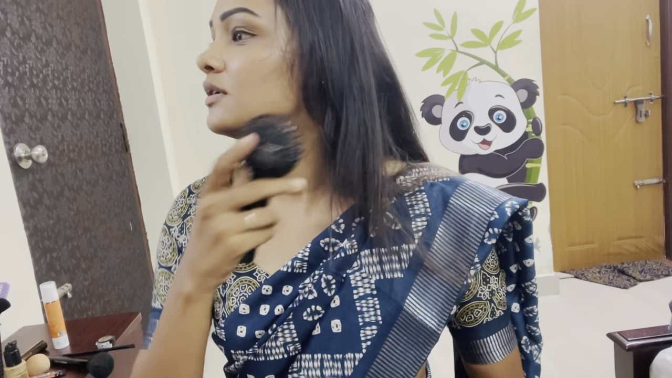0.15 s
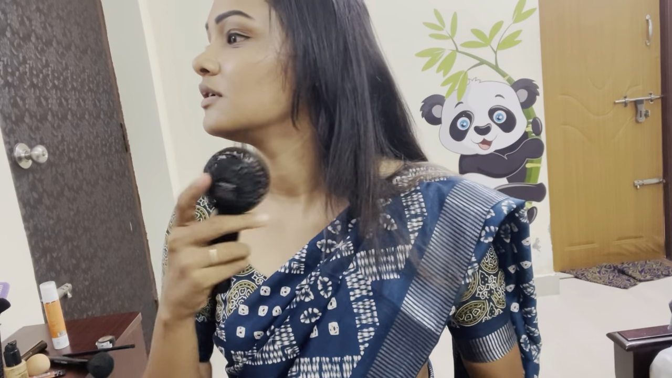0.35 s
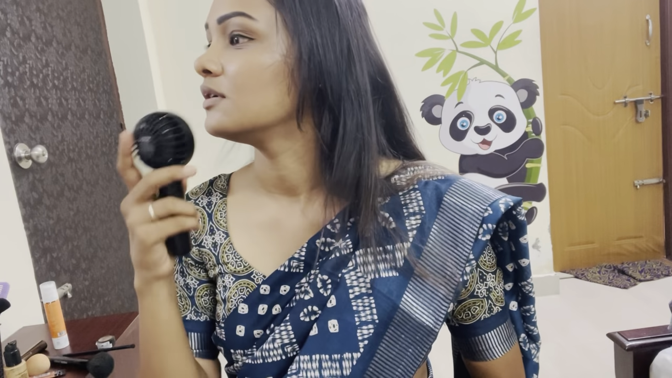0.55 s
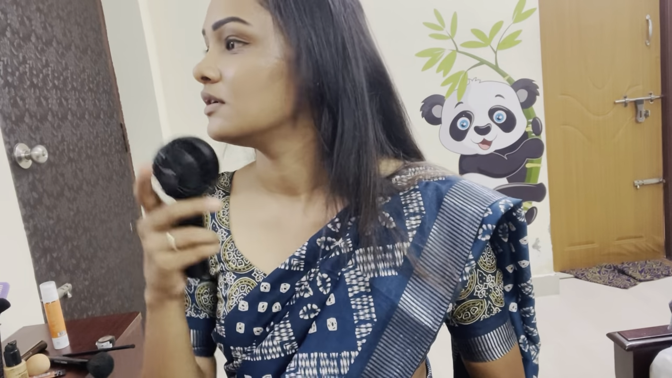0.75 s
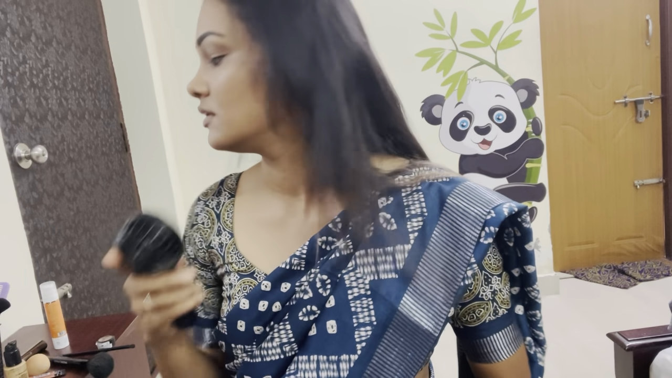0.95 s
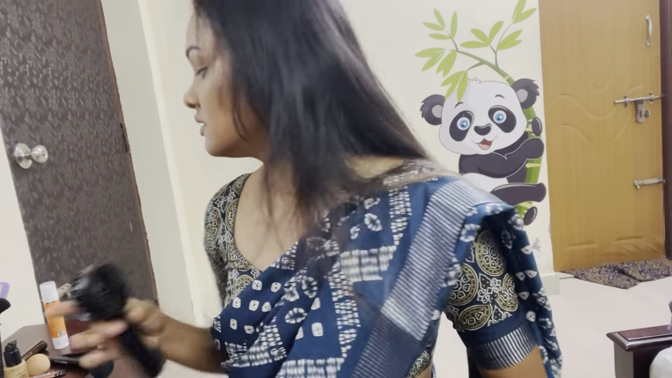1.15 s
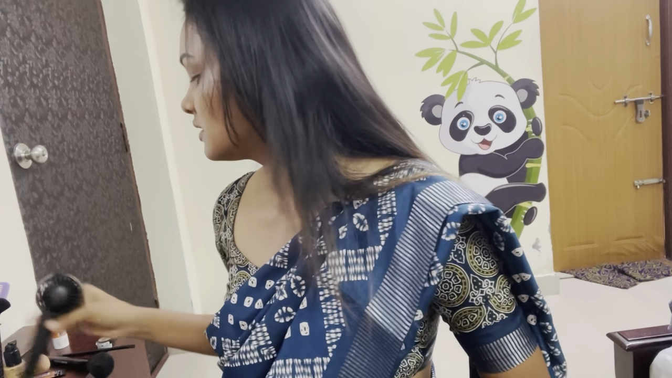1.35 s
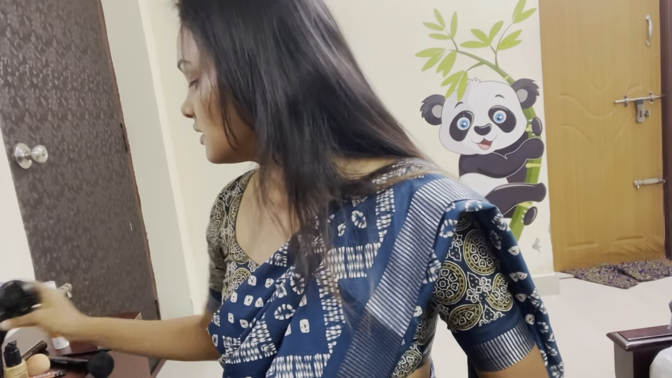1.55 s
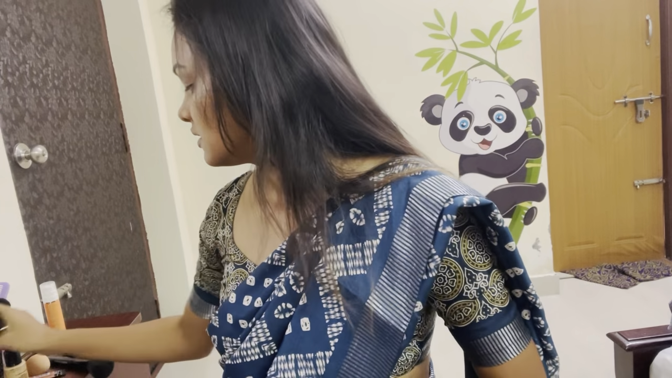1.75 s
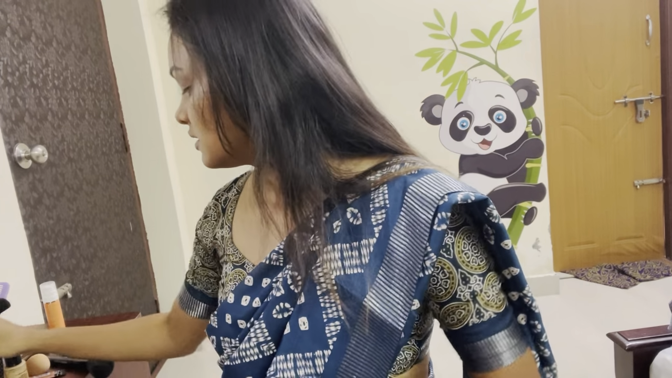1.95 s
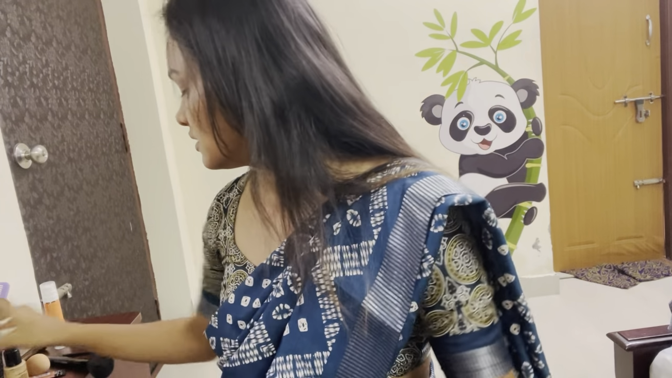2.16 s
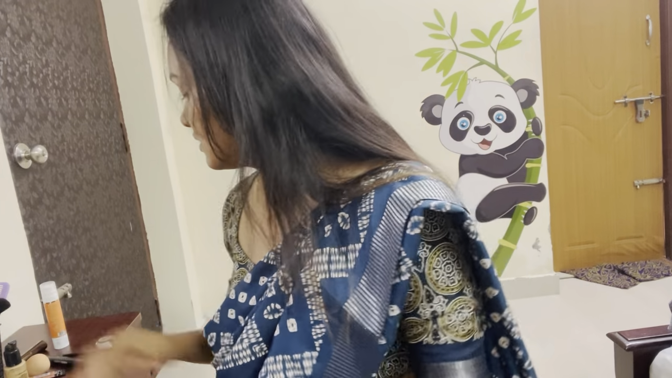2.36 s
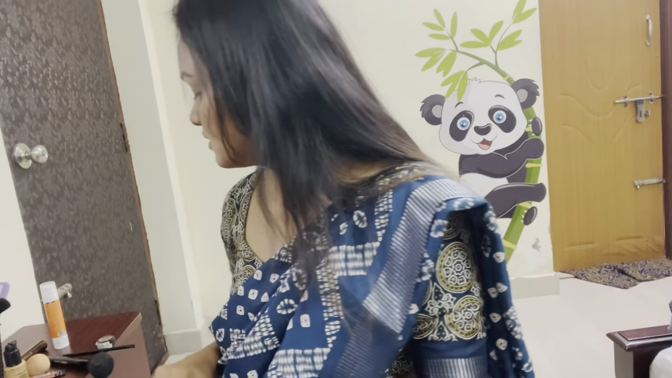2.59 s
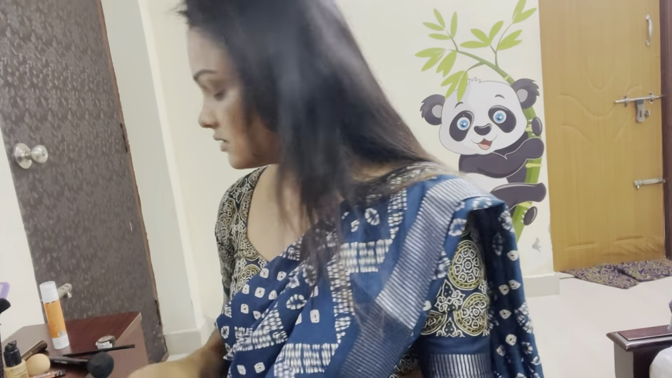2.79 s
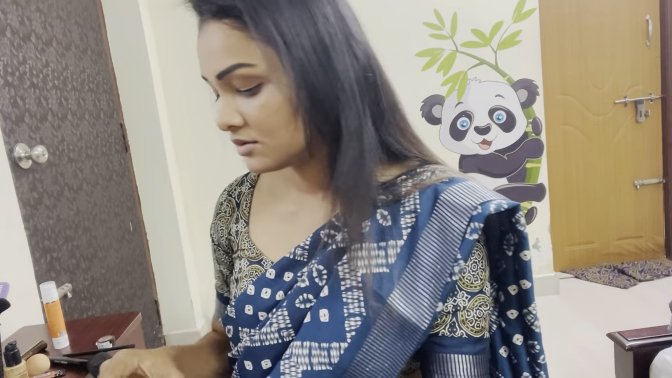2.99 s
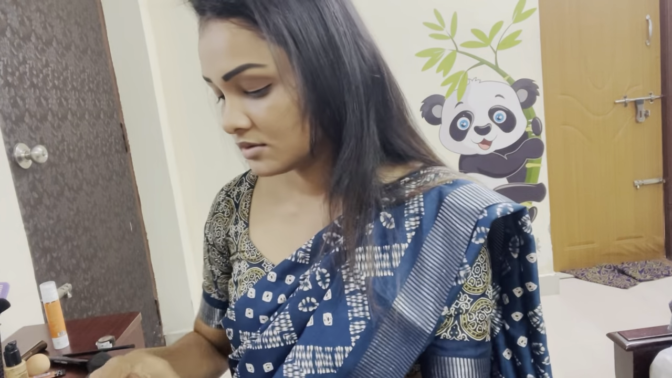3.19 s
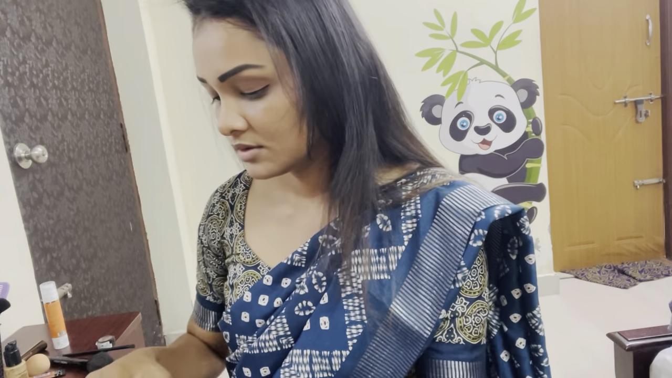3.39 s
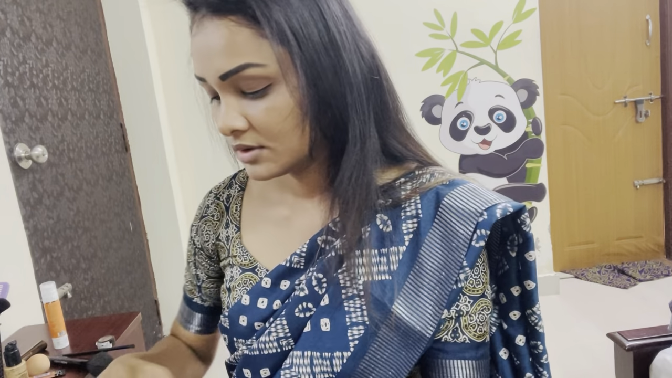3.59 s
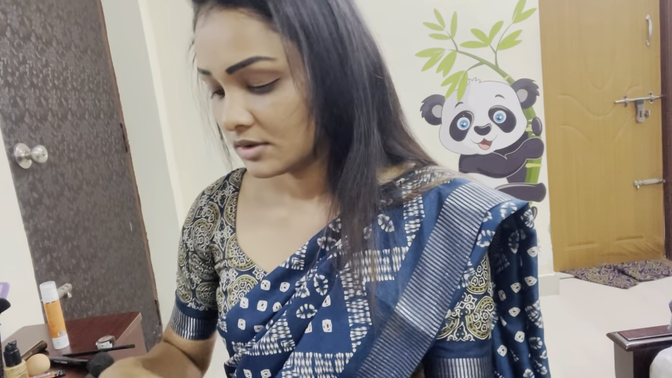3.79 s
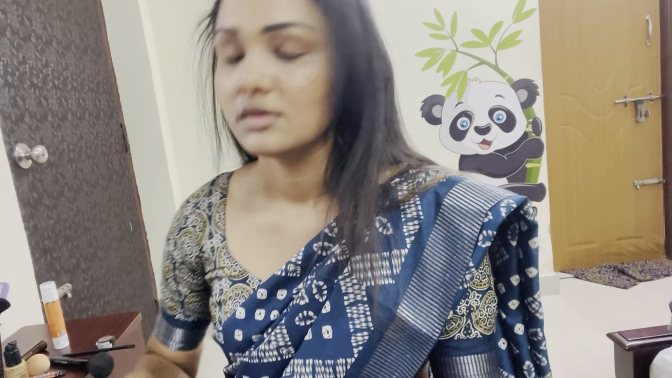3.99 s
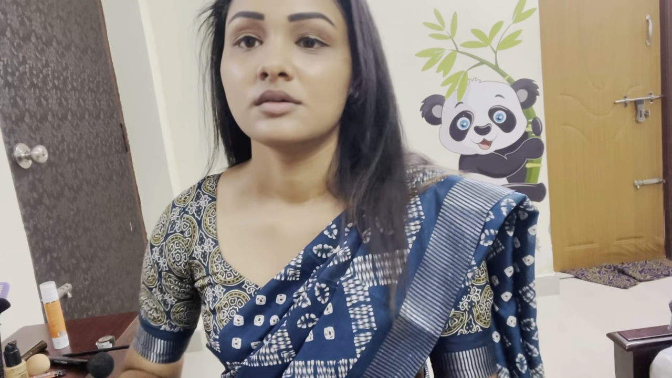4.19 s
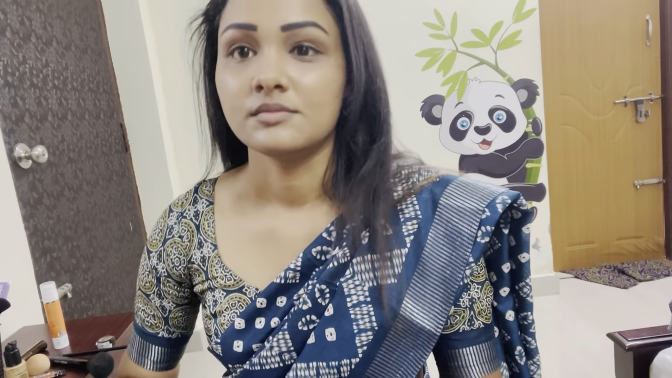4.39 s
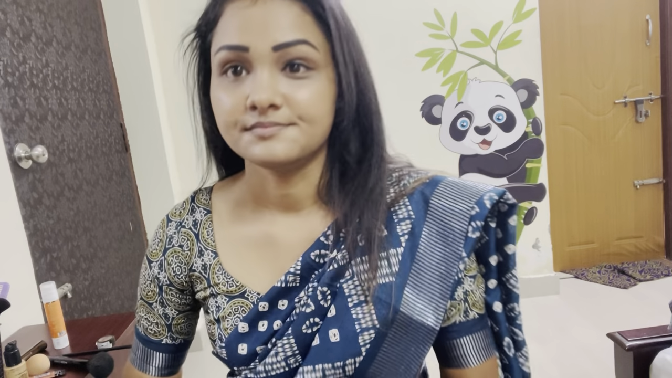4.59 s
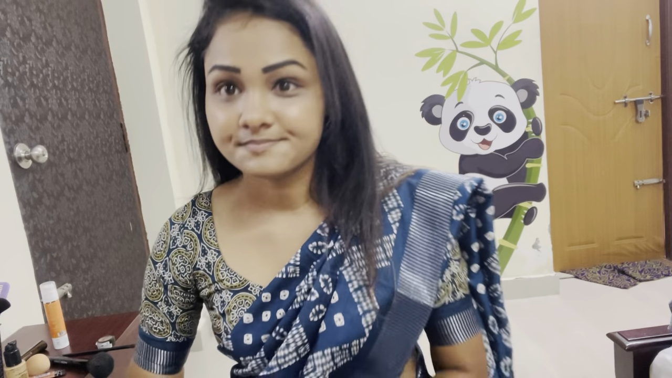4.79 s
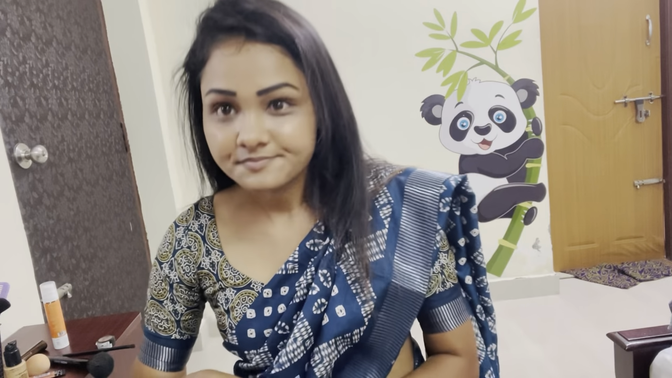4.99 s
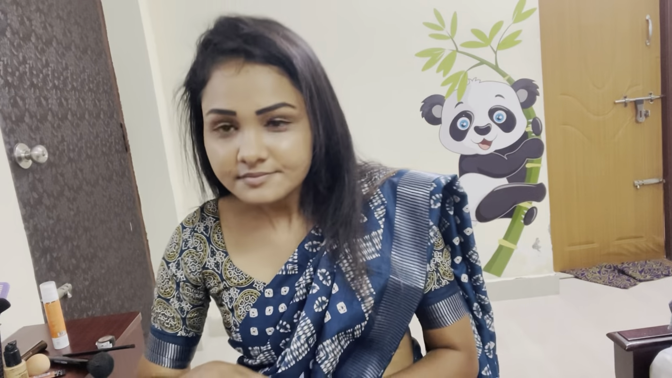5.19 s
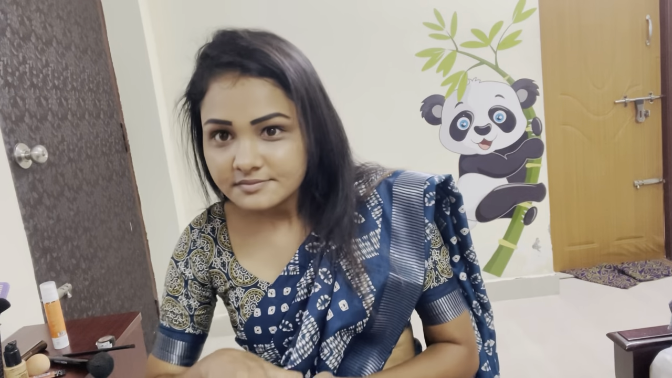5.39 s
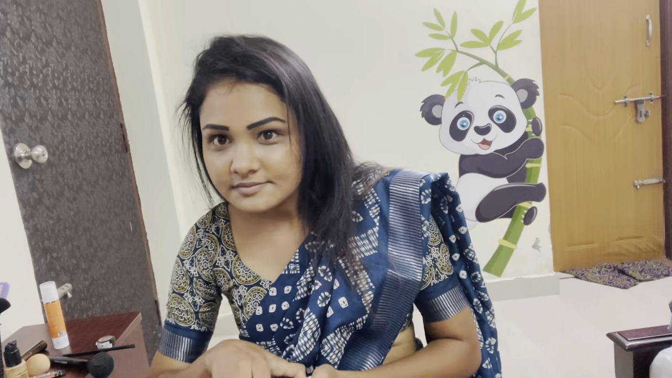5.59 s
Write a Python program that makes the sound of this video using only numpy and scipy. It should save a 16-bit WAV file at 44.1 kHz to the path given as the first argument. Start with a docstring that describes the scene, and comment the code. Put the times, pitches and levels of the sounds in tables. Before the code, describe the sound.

A small handheld fan whirs close by, switches off, then a knock and a clattering set-down on a table over low room hum.

```python
"""A small battery fan whirs close by: shaped noise for its air rush, sines at shaft multiples for its rotor.
It is switched off near 1 s. A 48 Hz hum, a thin wavering motor tone and house rumble (noise) run throughout.
A door knocks (modes, noise bursts), table things clatter and thud (contacts, blows, modes), cloth rustles (noise),
a faint noise band comes up briefly and a far horn toots three times (partials). The bedroom is hard-walled.
"""
import sys
import numpy as np
from scipy import signal
from scipy.fft import rfft, irfft
from scipy.io import wavfile
from scipy.ndimage import uniform_filter1d

SR = 44100
rng = np.random.default_rng(int(sys.argv[2]) if len(sys.argv) > 2 else 0)


def bounce(signal):
    """Save signal as a 16-bit WAV file at the path given by the first command-line argument."""
    frames = np.transpose(np.atleast_2d(signal))
    limited = np.clip(frames, -1, 1)
    pcm = np.round(limited * 32767).astype(np.int16)
    wavfile.write(sys.argv[1], SR, pcm)


N = 249164
T = np.arange(N) / SR


def undb(db):
    """dB to amplitude ratio."""
    return 10 ** (np.asarray(db) / 20)


def level(x, db):
    """Scale to an rms in dB."""
    return x * undb(db) / np.sqrt(np.mean(x ** 2))


def over_time(table):
    """Columns of a curve, one value a sample."""
    s, *columns = np.transpose(table)
    return [np.interp(T, s, c) for c in columns]


def over_hz(table, hz):
    """A spectrum read on a log-frequency axis."""
    f, v = np.transpose(table)
    return np.interp(np.log(np.maximum(hz, 1)), np.log(f), v)


def walk(rate_hz):
    """Random levels held 1 / rate_hz s and slewed twice; spread near 1."""
    k = int(SR / rate_hz)
    steps = np.repeat(rng.standard_normal(N // k + 1), k)
    return 1.3 * uniform_filter1d(uniform_filter1d(steps, k), k)[:N]


def colour(x, spectrum):
    """Causal minimum-phase filter with the given spectrum, by way of the cepstrum."""
    cep = irfft(np.log(undb(over_hz(spectrum, np.fft.rfftfreq(4096, 1 / SR)))))
    cep[1:2048] *= 2
    cep[2049:] = 0
    return signal.fftconvolve(x, irfft(np.exp(rfft(cep)))[:2048])[:N]


def ring(x, hz, t60_s):
    """One decaying mode: a complex one-pole resonator."""
    pole = np.exp(2j * np.pi * hz / SR - np.log(1000) / (max(t60_s, .005) * SR))
    return signal.lfilter([1], [1, -pole], x).imag


def stereo_spectrum(like, hz, n):
    """Noise spectra of two ports with the given likeness, from mid and side noise."""
    c = np.clip(over_hz(like, hz), -1, 1)
    mid, side = rfft(rng.standard_normal((2, n))) * np.sqrt([1 + c, 1 - c])
    return np.array([mid + side, mid - side])


def octave_shares(hz):
    """Ten overlapping octave bands, centred on 40 Hz and its doublings."""
    octave = np.log2(np.maximum(hz, 1) / 40)
    return [np.clip(1 - abs(octave - k), 0, 1) for k in range(10)]


def air(spectrum, like, pan, swell_db, flicker_db, flicker_hz):
    """Stereo noise in octave bands that swell together and flicker alone; rms 1."""
    hz = np.fft.rfftfreq(N, 1 / SR)
    tilt_db = over_hz(pan, hz) / 2
    gain_db = over_hz(spectrum, hz) + np.array([tilt_db, -tilt_db])
    pair = stereo_spectrum(like, hz, N) * undb(gain_db)
    out, swell = 0, walk(1.5)
    for share in octave_shares(hz):
        out = out + irfft(pair * share, N) * undb(swell_db * swell + flicker_db * walk(flicker_hz))
    return level(out, 0)


# Diffuse-field likeness of the ports: (frequency [Hz], left-right likeness [-1..1])
ROOM_LIKE = [(60, 0.93), (150, 0.82), (350, 0.24), (1400, 0.37), (5000, 0.17), (9000, -0.35), (12000, 1)]
# Reverberation time: (frequency [Hz], t60 [s])
ROOM_T60 = [(100, 0.62), (1000, 0.32), (4000, 0.53), (7000, 0.34), (12000, 0.13)]


def room(x, wet_db, direct_pan_db, lag):
    """Direct sound, lag samples later at the left port, plus a diffuse tail decaying band by band."""
    t = T[:int(.7 * SR)]
    hz = np.fft.rfftfreq(len(t), 1 / SR)
    noise, tail = stereo_spectrum(ROOM_LIKE, hz, len(t)), 0
    for k, share in enumerate(octave_shares(hz)):
        decay_db = -60 * t / over_hz(ROOM_T60, 40 * 2 ** k)
        tail = tail + irfft(noise * share, len(t)) * undb(decay_db)
    tail *= np.clip(t / 0.00065, 0, 1) / np.sqrt(np.sum(tail ** 2) / 2)
    wet = signal.fftconvolve(x[None], tail, axes=1)[:, :N]
    direct = np.array([np.roll(x, int(lag)), x]) * undb(np.array([[1], [-1]]) * direct_pan_db / 2)
    return direct + undb(wet_db) * wet


SHAFT_HZ, FLUTTER_DB, TONES_DB = 148.75, 2, 1.5  # shaft rate before drift; tone gain
RUSH_DB, OFF_S = -30, 1.047
SPIN_DOWN_DB_PER_S, MOTOR_CUT_DB_PER_S = 63, 250  # fade of rush and tones; extra fade of tones
FACE_ECHO_SHARE = 0.15
# Air rush spectrum: (frequency [Hz], relative density [dB per Hz])
RUSH = [(180, -39), (300, -16.5), (398, -1), (432, -47), (582, -9.5), (688, -13), (747, -6.5), (990, -14.5),
        (3380, -15), (7490, -23), (11900, -30.5), (14500, -36), (15800, -48.5)]
# Air rush at the ports: (frequency [Hz], left-right likeness [-1..1])
RUSH_LIKE = [(60, 0.8), (130, 0.73), (290, 0.13), (640, -0.21), (1410, 0.58), (3100, 0.6), (6820, -0.44),
             (15000, 1)]
# No pan: (frequency [Hz], left minus right [dB])
EVEN = [(1, 0), (2, 0)]
# Weak rotor tones: (multiple of shaft rate, relative level [dB])
ROTOR = [(12, -50), (14, -53), (17, -54)]
# Shaft multiples that swell as the fan turns: [multiple of shaft rate]
BEAMED = [4, 5, 9, 13, 18, 22]
# Their levels: (time [s], then relative level of each BEAMED tone [dB])
BEAMS = [(0.0, -48, -35, -52, -49, -45, -52), (0.14, -51, -33, -52, -39, -40, -50),
         (0.236, -36.5, -37, -46, -64, -54, -49), (0.286, -54, -34.5, -54, -41, -42, -48),
         (0.318, -36.5, -34, -48, -40, -41.5, -46), (0.492, -50, -36, -58, -51, -54, -45),
         (0.574, -48, -37, -50, -45, -53, -53), (0.672, -57, -40, -36.5, -46, -47, -37),
         (0.84, -46, -32, -50, -54, -55, -46.5), (0.908, -67, -34, -46, -52, -48, -37),
         (1.02, -51, -44, -46, -42, -53, -44), (1.06, -39, -33.5, -39, -43, -57, -59)]
# Phase wander of rotor tones: {multiple of shaft rate: wander [rad]}
BLUR = {9: 2, 13: 2.2, 18: 2.2, 22: .1}
# Shaft speeds up as the fan is lowered: (time [s], added share of shaft rate [1])
SHAFT_GAIN = [(0, 0), (.75, 0), (.97, .006), (1.1, .006)]
# Echo off face and hand: (time [s], mean delay [ms])
FACE_ECHO = [(0, .55), (.3, 0.65), (.55, 0.59), (.8, 0.56), (1.0, 0.53), (1.3, 1.0)]


def fan():
    """Air rush through the grille, plus rotor tones that swell and sink as the hand turns the fan."""
    off_s = np.maximum(T - OFF_S, 0)
    speed = 1 + over_time(SHAFT_GAIN)[0] + 0.0012 * walk(5.4)
    turn = 2 * np.pi * np.cumsum(SHAFT_HZ * speed) / SR
    lean_rad = np.array([[.45], [-.45]])
    tones = 0
    for k, db in [*zip(BEAMED, over_time(BEAMS)), *ROTOR]:
        amplitude = np.sqrt(2) * undb(db + FLUTTER_DB * walk(11.9))
        phase = k * turn + lean_rad + 2 * np.pi * rng.random() + BLUR.get(k, .3) * walk(39.8)
        tones = tones + amplitude * np.sin(phase)
    rush = air(RUSH, RUSH_LIKE, EVEN, 0.64, 0.38, 12.3)
    # dull echo combs the rush, its delay shifting
    late_s = T - over_time(FACE_ECHO)[0] * (1 + .1 * walk(6)) / 1000
    dull = signal.sosfilt(signal.butter(2, 3200, fs=SR, output="sos"), rush)
    rush = rush + FACE_ECHO_SHARE * np.array([np.interp(late_s, T, r) for r in dull])
    tones = undb(TONES_DB - MOTOR_CUT_DB_PER_S * off_s) * tones
    return undb(-SPIN_DOWN_DB_PER_S * off_s) * (undb(RUSH_DB) * rush + tones)


HUM_HZ, HUM_DB, HUM_PAN_DB, HUM_LEAD_RAD = 48.1, -21.5, 2.5, .08  # lead of the left port
# Motor tone: (time [s], frequency [Hz], mean level [dB])
WHINE = [(0, 398, -35.5), (1.0, 396.7, -35), (2.3, 401.2, -32), (2.7, 384, -34.5), (3.2, 381, -39.5),
         (5.65, 375, -49)]


def machines():
    """Steady hum, nearly alike at both ports, and a thin wavering motor tone, out of phase between them."""
    side = np.array([[.5], [-.5]])
    hum_amplitude = np.sqrt(2) * undb(HUM_DB + HUM_PAN_DB * side + 0.69 * walk(5.29))
    hum_phase = 2 * np.pi * HUM_HZ * T + 4.33 + HUM_LEAD_RAD * side + 0.057 * walk(5.7)
    hz, db = over_time(WHINE)
    whine_phase = 2 * np.pi * np.cumsum(hz) / SR + 1.94 * side + 1.02 * walk(9.8)
    whine = undb(db + 4.05 * walk(11.07)) * np.sin(whine_phase)
    return hum_amplitude * np.sin(hum_phase) + whine


# Rumble spectrum: (frequency [Hz], relative density [dB per Hz])
HOUSE = [(32, -12.5), (55, -15), (77, -5.5), (97, -14.5), (207, -10), (282, -17), (375, -16.5),
         (574, -17.5), (818, -18), (1090, -24), (2740, -38), (3230, -41.5), (7400, -66.5), (13100, -67.5),
         (15800, -86)]
# Rumble level: (time [s], level [dB])
HOUSE_DB = [(0, -28), (1.4, -27), (2.6, -28), (3.5, -28), (4.5, -29), (5.65, -29.5)]
# Rumble at the ports: (frequency [Hz], left-right likeness [-1..1])
HOUSE_LIKE = [(60, 0.96), (130, 0.77), (290, 0.68), (640, -0.021), (1410, -0.36), (3100, -0.044),
              (6820, -0.34), (15000, 0.73)]
# Rumble balance: (frequency [Hz], left minus right [dB])
HOUSE_PAN = [(60, 7), (110, -2.5), (200, 4.5), (380, -2), (700, -2), (1290, -0.5), (2380, 0), (4400, 0),
             (8120, 5.5), (15000, -5)]


def house():
    """Rumble of the house: shaped stereo noise on a slow level curve."""
    return undb(over_time(HOUSE_DB)[0]) * air(HOUSE, HOUSE_LIKE, HOUSE_PAN, 0.29, 0.52, 6.03)


KNOCK_S = 0.0075  # decay constant of a shudder
# Knocks: (time [s], relative level [dB])
KNOCKS = [(1.4999, -8.5), (4.760, -11.5)]
# Wood modes: (frequency [Hz], relative level [dB], t60 [s])
DOOR = [(689, 0, 0.07), (1077, 2, 0.1), (1258, 1, 0.045), (1432, 1, 0.075), (1945, -4, 0.03),
        (2330, -4, 0.03), (2800, -10, .02)]
# Snap spectrum: (frequency [Hz], gain [dB])
SNAP = [(400, -11), (1400, -2.5), (2500, -8.5), (3600, -15.5), (4500, -18), (5500, -26), (7000, -29.5),
        (12000, -80)]


def door():
    """Dull knocks on wood: each a short shudder driving modes, smeared by the walls."""
    push, first = np.zeros(N), np.zeros(N)
    decay = np.exp(-T[:3000] / KNOCK_S) / np.sqrt(KNOCK_S * SR / 2)
    for (s, db), shudder in zip(KNOCKS, rng.standard_normal((len(KNOCKS), 3000))):
        at = int(s * SR)
        push[at:at + 3000] = undb(db) * shudder * decay
        first[at] = undb(db)
    body = sum(undb(db) * ring(0.3 * first + push, hz, t60_s) for hz, db, t60_s in DOOR)
    snap = colour(push, SNAP)
    return room(undb(-22) * body + undb(21) * snap, 2.4, 0.082, lag=-5)


RATTLE_START_DB, CLATTER_WET_DB = -3, -4  # start re peak; room tail
CLACK_T60_S, CRACK_T60_S, CLACK_DB, CRACK_RING_DB = .018, .012, -3, 1  # gains re each blow
# Sliding and rattling: (time [s], build-up [s], relative peak [dB], decay [dB/s], weight [0 light..1 heavy])
RATTLES = [(1.721, 0.079, -13, 164, 0.01), (1.939, 0.015, -18, 300, 0.9), (1.967, 0.014, -15.5, 447, 0.85),
           (2.001, 0.042, -28.5, 147, 0.8)]
# Distinct blows: (time [s], relative peak [dB], clack [Hz], relative crack [dB], crack [Hz], weight [0..1])
BLOWS = [(1.7251, 5, 1700, -28, 4070, 0.16), (1.737, -5, 2000, -32, 4820, 0.55),
         (1.748, 3, 1710, -6.5, 5050, 0.03), (1.757, -4.5, 2220, -20, 6800, 0.2),
         (1.765, 3, 1310, -15, 3400, 0.12), (1.773, 2, 990, -10.5, 3300, 0.12),
         (1.786, -4, 1690, -35, 4000, 0), (1.798, 0.5, 1750, -15, 3450, 0.12),
         (1.805, 0, 1190, -31, 4080, 0), (1.814, -3, 1720, -30, 6800, 0.5), (1.82, -3, 970, -32, 3430, 0),
         (1.834, -11, 1320, -37, 3400, 0.2), (1.855, -6.5, 1290, -38, 3300, 0.5),
         (1.942, -8, 1010, -14, 5900, 0.1), (1.947, 3, 990, -38, 3530, 0.44),
         (1.956, -1.5, 836, -29, 3500, 0.92), (1.974, -2, 875, -31, 2740, 1),
         (1.978, -8.5, 1330, -21, 6000, 1), (1.987, -5.5, 1550, -35, 3540, 0.8),
         (1.993, -6.5, 870, -24, 2800, 1), (2.008, -9, 910, -37, 3820, 1), (2.023, -7, 885, -24, 2840, 0.6),
         (2.051, -22, 1500, -33.5, 2150, 0.5)]
# Light contact spectrum: (frequency [Hz], relative density [dB per Hz])
LIGHT = [(60, -18), (140, -17), (560, -12.5), (830, 2), (1250, 0.5), (1750, 2.5), (2100, -4.5),
         (2800, -8.5), (3600, -10.5), (4500, -18), (5800, -24), (8000, -28), (11700, -28.5), (15800, -48)]
# Heavy contact spectrum: (frequency [Hz], relative density [dB per Hz])
HEAVY = [(60, -21), (210, -11), (300, -20), (460, -4), (540, -6), (900, -5.5), (1000, -6.5), (1960, -8.5),
         (2430, -20.5), (4000, -21.5), (6100, -26), (8000, -36), (12000, -32), (15800, -45)]
# Table modes: (frequency [Hz], width [Hz], relative level [dB])
TABLE_MODES = [(470, 25, -9), (835, 60, -4), (980, 30, -5), (1176, 22, -4), (1330, 26, -2), (1500, 40, 5),
               (1730, 110, 2.5), (2210, 35, -4), (2710, 60, -1), (3310, 68, -5), (3490, 40, -11),
               (4030, 35, -10), (6800, 190, 8)]
# Table bass modes: (frequency [Hz], relative level [dB], t60 [s])
TABLE_BASS = [(70.3, -1, 0.27), (121.6, 3, 0.067), (172, 3.5, 0.046), (217, 5, 0.02)]


def clatter():
    """Dense small contacts and hard blows excite the table; heavy ones reach its bass."""
    power = np.zeros((2, N))
    for s, build_s, db, fall_db_per_s, weight in RATTLES:
        shape_db = db + RATTLE_START_DB * np.clip(1 - (T - s) / build_s, 0, 1)
        shape_db -= 8 * np.clip(1 - (T - s) / .004, 0, 1)  # soft onset
        shape_db -= fall_db_per_s * np.maximum(T - s - build_s, 0)
        power += (T >= s) * undb(shape_db) ** 2 * np.clip([[1 - weight], [weight]], 0, 1)
    # one random strength per 60 samples
    strength = np.repeat(np.minimum(rng.exponential(size=N // 60 + 1), 3), 60)[:N]
    contacts = level(rng.standard_normal(N) * undb(3.9 * strength), 0)
    light, heavy = contacts * np.sqrt(power)
    clacks, thump = np.zeros((2, N))

    t = T[:1500]
    tap = 1. * (t == 0)
    bright = signal.butter(2, [2500, 14000], "band", fs=SR, output="sos")
    bursts = rng.standard_normal((len(BLOWS), 2, 1500))
    for (s, peak_db, clack_hz, crack_db, crack_hz, weight), (body, tick) in zip(BLOWS, bursts):
        start = int(s * SR)
        at, weight = slice(start, start + 1500), np.clip(weight, 0, 1)
        blow = undb(peak_db) * body * np.exp(-t / 0.0012)
        light[at] += undb(-5.0) * np.sqrt(1 - weight) * blow
        heavy[at] += undb(-12.0) * np.sqrt(weight) * blow
        tick = undb(crack_db) * tick * np.exp(-t / 0.0013)
        clacks[at] += undb(peak_db + CLACK_DB) * ring(tap, clack_hz, CLACK_T60_S)
        clacks[at] += undb(crack_db + CRACK_RING_DB) * ring(tap, crack_hz, CRACK_T60_S)
        clacks[at] += signal.sosfilt(bright, tick)
        thump[start] = weight * undb(peak_db)
    clacks = signal.sosfilt(signal.butter(2, 500, "high", fs=SR, output="sos"), clacks)

    probe = rng.standard_normal(N)  # sets both filters to unit gain on white noise
    plain = sum(colour(x, c) / colour(probe, c).std() for x, c in ((light, LIGHT), (heavy, HEAVY)))
    modes = sum(undb(db) * ring(plain, hz, 2.2 / width_hz) * width_hz for hz, width_hz, db in TABLE_MODES)
    modes = modes * 2 * np.pi / SR
    bass = sum(undb(db) * ring(thump, hz, t60_s) for hz, db, t60_s in TABLE_BASS)
    mix = plain + undb(-9.0) * modes + undb(-17.5) * bass + clacks
    return room(mix, CLATTER_WET_DB, -1.8, lag=13)  # from the right


RUSTLE_EDGE_DB, RUSTLE_FADE_DB_PER_S = 6, 134  # drop across swell and linger; fade beyond
# Cloth moves: (peak time [s], swell [s], linger [s], swish level [dB], hiss level [dB])
RUSTLES = [(2.36, 0.027, 0.07, -50, -60.5), (2.8, 0.022, 0.092, -72, -67), (3.48, .05, 0.16, -49.5, -68),
           (3.95, 0.3, 0.14, -44, -61), (4.58, 0.13, 0.3, -53.5, -64), (4.86, 0.11, 0.4, -53, -61),
           (5.46, 0.069, 0.12, -46, -63)]
# Broad swish spectrum: (frequency [Hz], relative density [dB per Hz])
SWISH = [(500, -35), (1500, -2.5), (3000, -4), (6000, -12.5), (7500, -28), (16000, -42)]
# Fine hiss spectrum: (frequency [Hz], relative density [dB per Hz])
HISS = [(3000, -48), (7500, -11), (9500, 1.5), (13000, -8), (16000, -8.5)]


def cloth():
    """Rubbing fabric: a broad swish and a finer, grainy hiss."""
    swish_power = hiss_power = 0
    for s, swell_s, linger_s, swish_db, hiss_db in RUSTLES:
        span_s, away_s = np.maximum(np.where(T < s, swell_s, linger_s), .005), abs(T - s)
        shape_db = -RUSTLE_EDGE_DB * np.minimum(away_s / span_s, 1)
        shape_db -= RUSTLE_FADE_DB_PER_S * np.maximum(away_s - span_s, 0)
        swish_power = swish_power + undb(shape_db + swish_db) ** 2
        hiss_power = hiss_power + undb(shape_db + hiss_db) ** 2
    grains = undb(1.1 * uniform_filter1d(rng.exponential(size=N), size=12))
    swish = air(SWISH, ROOM_LIKE, EVEN, 0.4, 0.63, 4.8)
    hiss = level(air(HISS, ROOM_LIKE, EVEN, .5, 0.6, 23) * grains, 0)
    return np.sqrt(swish_power) * swish + np.sqrt(hiss_power) * hiss


BAND_HZ, BAND_WIDTH_HZ, BAND_DB, BAND_FROM_S, BAND_TO_S = 1580, 380, -42.5, 3.56, 4.02


def faint_band():
    """A patchy band of noise, different at the two ports."""
    edges_hz = [BAND_HZ - BAND_WIDTH_HZ / 2, BAND_HZ + BAND_WIDTH_HZ / 2]
    band = signal.butter(2, edges_hz, "band", fs=SR, output="sos")
    noise = signal.sosfilt(band, rng.standard_normal((2, N)))
    shape = np.clip(np.minimum(T - BAND_FROM_S, BAND_TO_S - T) / 0.048, 0, 1)
    return level(noise, BAND_DB) * shape * undb(2.6 * walk(26))


TOOT_ATTACK_S, TOOT_RELEASE_S, TOOT_SAG = 0.01, 0.056, 0.01  # sag as share of pitch
FADING_DB, FADING_HZ = 1.5, 14
# Toots: (time [s], length before release [s], mean fundamental [Hz])
TOOTS = [(3.763, 0.092, 322), (3.94, .6, 324), (4.601, 0.105, 322.6)]
# Audible partials: (multiple of fundamental, relative level [dB], level column of HORN_LEVELS [0 or 1])
HORN_ORDERS = [(8, -13, 0), (9, -2, 1), (10, -2, 0), (11, -18, 1)]
# Strength reaching the room: (time [s], even multiples' level [dB], odd multiples' level [dB])
HORN_LEVELS = [(3.75, -63, -67), (3.772, -53, -47), (3.826, -41.5, -56), (3.924, -62, -58),
               (3.946, -46, -46), (4.002, -45, -42), (4.024, -43, -50), (4.06, -53, -43.5),
               (4.086, -50, -50), (4.112, -59, -56), (4.144, -45, -46), (4.172, -53, -45),
               (4.208, -41, -56), (4.234, -53, -46), (4.304, -38.5, -58), (4.342, -48, -46),
               (4.37, -48, -42), (4.392, -50, -44.5), (4.438, -43, -54), (4.484, -43, -40),
               (4.518, -55, -46), (4.59, -57, -67), (4.606, -52, -67.5), (4.654, -46, -50),
               (4.732, -62, -65), (4.75, -59, -63)]


def horn():
    """Only partials near the bell resonance carry this far; pitch sags at both ends of a toot."""
    tone, levels_db = 0, over_time(HORN_LEVELS)
    fading = []
    for k, db, column in HORN_ORDERS:
        strength = undb(db + levels_db[column] + FADING_DB * walk(FADING_HZ))
        scatter = 1.3 + walk(70) + 1j * walk(70)  # random amplitude and phase
        fading.append(strength * scatter)
    unsteady = 1 + 0.00197 * walk(5.2)
    for s, length_s, hz in TOOTS:
        attack = np.clip((T - s) / TOOT_ATTACK_S, 0, 1)
        release = np.clip(1 - (T - s - length_s) / TOOT_RELEASE_S, 0, 1)
        from_end_s = np.maximum(np.minimum(T - s, s + length_s - T), 0)
        sag = TOOT_SAG * np.exp(-from_end_s / .03)
        turn = 2 * np.pi * np.cumsum(hz * (unsteady - sag)) / SR
        partials = sum((f * np.exp(1j * k * turn)).imag for (k, _, _), f in zip(HORN_ORDERS, fading))
        tone = tone + attack * release * partials
    return room(tone, -9, 0, lag=0)


def scene():
    """Sum of all sources at the two ports."""
    return fan() + machines() + house() + door() + clatter() + cloth() + faint_band() + horn()


TOP_HZ = 15950


def record(dry):
    """The phone clips at full scale and cuts the top."""
    return signal.sosfilt(signal.ellip(8, .2, 60, TOP_HZ, fs=SR, output="sos"), np.clip(dry, -1, 1))


dry = scene()
out = record(dry)
bounce(out)
```